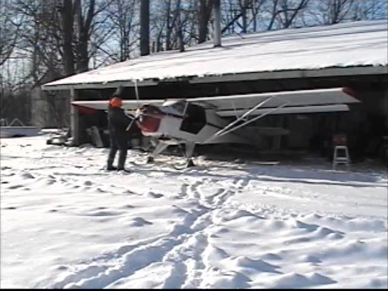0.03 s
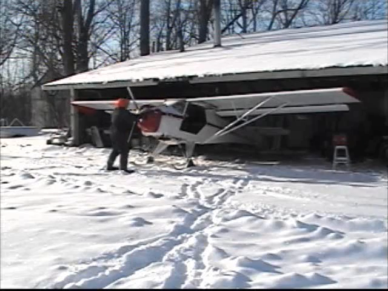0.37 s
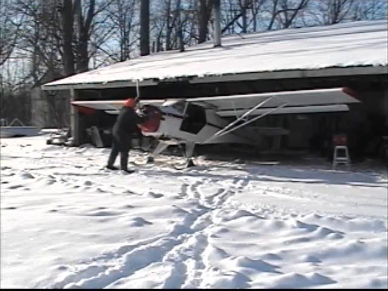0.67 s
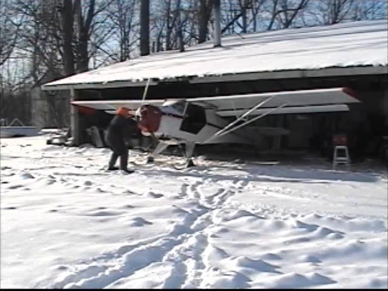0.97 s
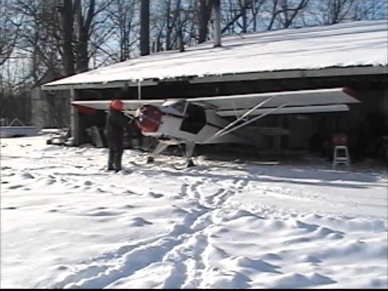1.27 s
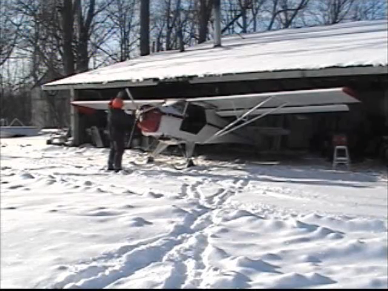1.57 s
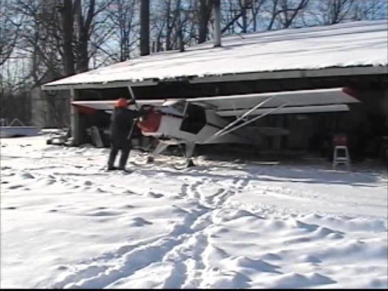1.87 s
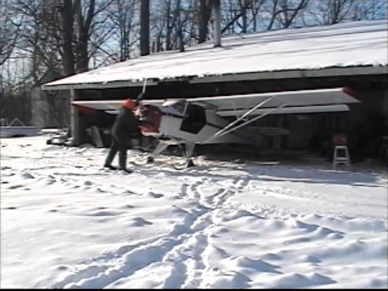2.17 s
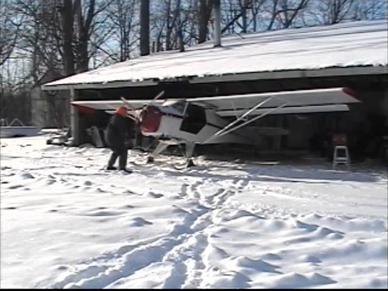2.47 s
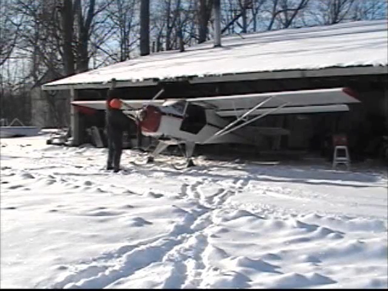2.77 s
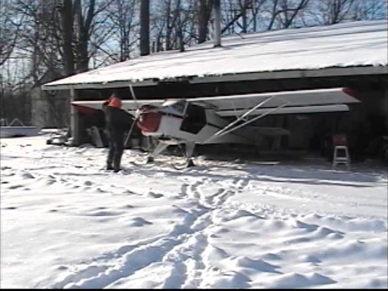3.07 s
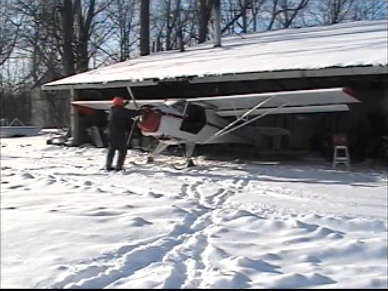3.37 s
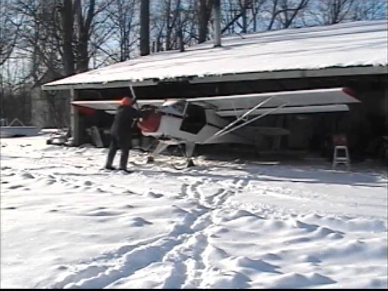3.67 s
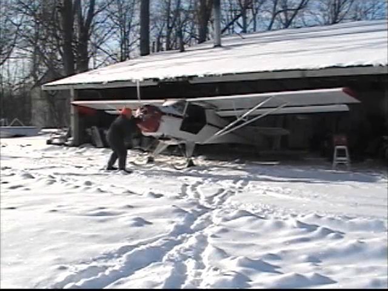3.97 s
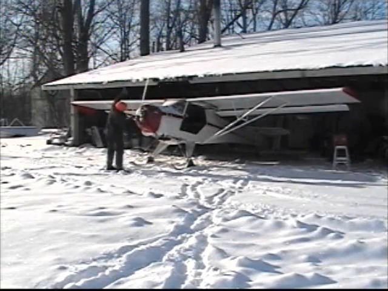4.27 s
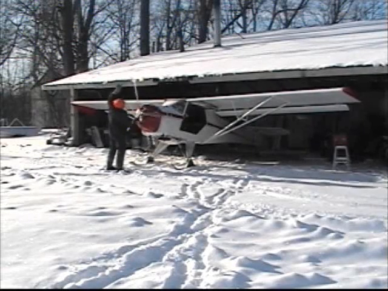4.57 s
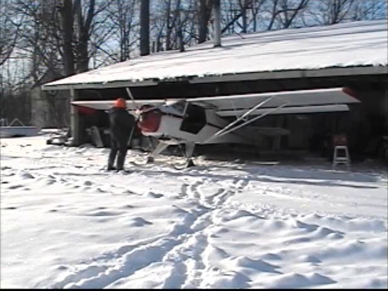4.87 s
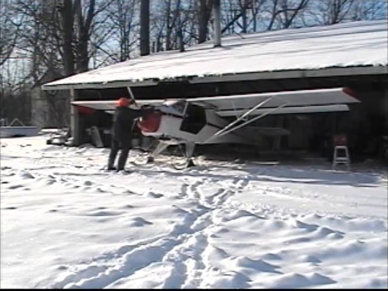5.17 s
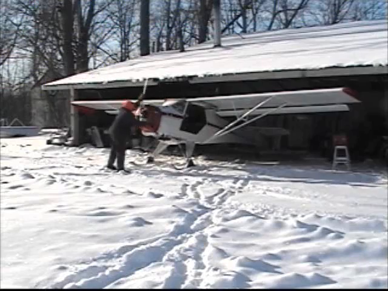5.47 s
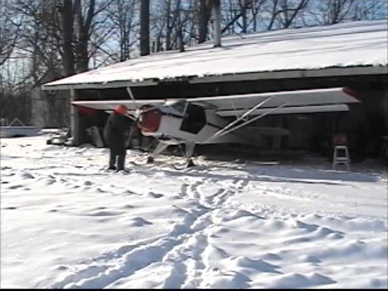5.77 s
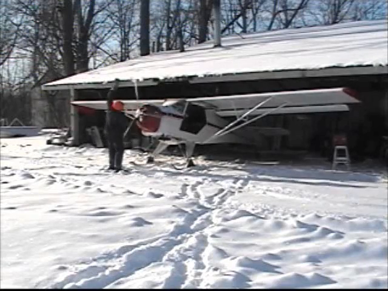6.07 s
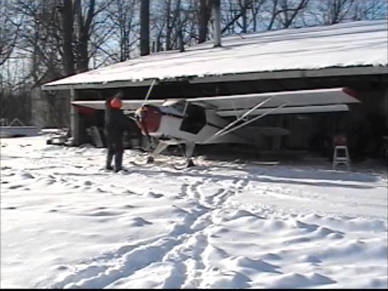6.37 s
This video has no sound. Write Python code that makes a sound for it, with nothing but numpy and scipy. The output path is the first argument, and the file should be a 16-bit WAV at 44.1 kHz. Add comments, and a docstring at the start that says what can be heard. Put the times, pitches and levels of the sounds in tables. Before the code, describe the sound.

A small aircraft's propeller is swung by hand five times, the engine chuffing and gasping in short bursts without starting.

```python
"""In the snow before an open hangar, a small aircraft's propeller is swung by hand five times.
The two-stroke engine does not start. Each piston stroke lets out a hollow chuff and draws a gasp of air,
over a rush and clatter that grow with the shaft's speed. A few times the fuel fires weakly, with a sharp
spit, a surge of gas and a boom in the muffler. Boots scuff amid brief whistles and creaks, and the
hangar echoes. A camcorder hears it all over faint outdoor noise and its own hiss and whine."""
import sys
import numpy as np
from scipy import signal
from scipy.fft import rfft, irfft, next_fast_len
from scipy.io import wavfile
from scipy.ndimage import map_coordinates

SR = 44100
rng = np.random.default_rng(int(sys.argv[2]) if len(sys.argv) > 2 else 0)


def wav_record(signal):
    """Record a signal, one row per channel, as 16-bit PCM in the file named by sys.argv[1]."""
    frames = np.transpose(np.atleast_2d(signal))
    bounded = np.clip(frames, -1, 1)
    # unit amplitude maps onto the largest positive 16-bit level
    quanta = np.round(bounded * 32767).astype(np.int16)
    wavfile.write(sys.argv[1], SR, quanta)


N = 287973

# Levels in the tables are relative: the functions add their own gains.
# The tone colour of each noise: (frequency [Hz], level [dB])
OUTDOOR_NOISE = [(15, -32), (25, 1), (38, -4.5), (52, -2), (100, 0), (160, -8), (260, -1.5), (360, -0.5),
                 (500, -2), (800, -2), (1010, -3), (1150, -17), (1700, -35), (3500, -80)]
CAMCORDER_HISS = [(700, -53), (1100, -1.5), (1500, 0.5), (1900, 0), (2900, -3), (3500, -4), (4500, -7),
                  (5100, -5.5), (6200, -7.5), (7400, -4), (8300, -10.5), (11000, -15), (13000, -25),
                  (15800, -37)]
SNOW_CRUNCH = [(600, -21), (1500, 5), (2300, 2), (3100, -1.5), (4000, -5), (7000, -14), (14000, -37)]
MUFFLER_RUMBLE = [(20, -14), (45, -1), (80, 18), (130, 15), (180, 12), (260, 4), (420, -46)]
AIR_RUSH = [(150, -51), (260, -2.5), (420, -1), (800, 2), (1300, -2), (2200, -3), (2900, -4.5), (3800, -8),
            (6500, -13), (8500, -18), (11500, -25.5), (15500, -71)]
EXHAUST_JET = [(1000, -31), (3500, 8), (6000, 5), (8500, 0.5), (10500, -5), (13000, -17), (15800, -68)]
INTAKE_HISS = [(150, -52), (250, -0.5), (482, -0.5), (646, -7), (1160, 2), (1310, -8), (2800, -0.5),
               (3890, -8.5), (6640, -9.5), (9700, -19), (12400, -29.5), (14400, -57), (15500, -44)]
EDGE_HISS = [(500, -39), (1300, 7), (2000, 1.5), (3000, 8), (4200, -8), (5500, -16), (6600, 3), (8000, -33),
             (14000, -68)]  # air at the edge of the exhaust opening
FIRING_SPIT = [(200, -30), (500, -42), (1400, -2), (2150, 5.5), (3000, 0), (5000, -0.5), (7200, 6.5),
               (9500, 4), (11500, -1.5), (13500, -11), (15800, -49)]

# The camcorder's thin whines and high line-scan whistle: (frequency [Hz], level [dB])
MID_WHINE = [(2697, -62), (3472, -64), (6745, -61), (7494, -62), (7790, -61), (15735, -61)]  # "mid" is what left and right share
SIDE_WHINE = [(582, -40.5), (1160, -51), (7494, -62)]  # "side" is added to the left and taken from the right
# How strong the side is next to the mid: (frequency [Hz], level [dB])
BACKGROUND_WIDTH = [(60, 3), (110, -1), (200, -2), (380, -3.5), (700, -2), (1290, -2.5), (2380, -4.5),
                    (4400, -6), (8120, -5), (15000, -3)]  # noise arriving from all around
PHASE_WIDTH = [(25, -1), (80, -3), (130, -5), (260, -10), (400, -15), (600, -22), (2000, -28), (5000, -32)]  # waves reaching the two microphones out of step
SCATTER_WIDTH = [(100, -24), (500, -24.5), (1200, -18), (2800, -12.5), (5000, -11.5), (9000, -7),
                 (15000, -10)]  # sound scattered unequally to the two microphones
# How much louder the left is than the right: (frequency [Hz], level [dB])
BALANCE = [(60, -4), (130, -1.5), (290, 1), (640, 1.0), (1410, 1.0), (3100, 1.5), (6820, -1), (15000, 2.5)]

# How long the hangar's echo takes to fade by 60 dB: (frequency [Hz], time [s])
HANGAR_FADE = [(100, 1), (500, 0.59), (2000, 0.15), (6000, 0.2), (14000, 0.28)]
# Bounces in the exhaust and off the aircraft; open ends flip the wave: (delay [s], gain [ratio])
ECHOES = [(.0036, -.5), (.0092, -.45), (.0111, -.78), (.0171, .4), (.0191, .5), (.0232, .45)]
# The pitches at which each part rings: (frequency [Hz], width [Hz], level [dB])
MUFFLER_RING = [(55, 27, -8), (92.2, 19.4, -1.5)]
CASING_RING = [(1910, 140, 1), (2170, 160, 3), (2830, 470, 1), (5100, 1300, -9.5), (6630, 380, -9)]
PASSAGE_RING = [(1350, 150, 3), (1876, 114, 4.5), (2146, 85, 7), (2814, 135, 2), (3353, 15, 3)]
EXHAUST_RING = [(97, 5.1, -3), (259.4, 40, -2), (397.6, 213, -0.5), (623, 374, 1.5), (908, 504, -1)]

# Boots scuff the snow: (time [s], level [dB])
SCUFFS = [(0.1394, -16), (0.2134, -21.5), (0.31, -22), (0.7332, -24.5), (0.86, -31), (1.605, -19),
          (3.847, -26), (3.9094, -18.5), (3.95, -26), (4.9, -16.5), (5.615, -29)]
# Brief whistles and squeaky creaks: (time [s], frequency [Hz], level [dB], length [s])
WHISTLES_AND_CREAKS = [(0.293, 2165, -33.5, 0.039), (0.74, 1287, -42, 0.1), (1.021, 2750, -20, 0.017),
                       (1.354, 2156, -21, 0.03), (1.578, 1510, -36, 0.07), (2.642, 2160, -25, 0.03),
                       (2.894, 1880, -19, 0.03), (3.85, 1570, -46, 0.1), (4.533, 2176, -20.5, 0.049),
                       (5.72, 1395, -27.5, 0.031), (5.738, 2720, -25.5, 0.024), (5.94, 2180, -19, 0.046),
                       (5.999, 2160, -18, 0.04)]
# Propeller swings: (pull time [s], fastest time [s], stop time [s], peak airflow [dB])
SWINGS = [(-0.4, -0.076, 0.09, -17.5), (0.945, 1.293, 1.45, -18.5), (2.369, 2.747, 3.057, -21),
          (4.001, 4.417, 4.774, -17), (5.665, 6.114, 6.372, -17.5)]
# Air leaks past the piston just before a chuff: (time [s], level [dB])
LEAKS = [(0.936, -23.5), (1.06, -34), (1.166, -23), (2.368, -23.5), (2.495, -23), (2.603, -20.5),
         (3.997, -21), (5.653, -27), (5.787, -29)]
# The piston uncovers the exhaust: (time [s], chuff level [dB], hiss over chuff [dB], gasp level [dB])
STROKES = [(0.0, -10, -14, -8.5), (0.082, -5, -6, -20), (0.166, -15.5, -18, -30), (0.954, -11.5, -15, -9.5),
           (1.08, -7.5, -6.5, -12), (1.177, -2.5, -10, -5), (1.252, -3.5, -4, -11),
           (1.333, -10.5, -12, -10.5), (1.419, -7.5, -3, -15), (2.235, -19.5, -13, -26),
           (2.383, -10.5, -6, -12), (2.514, -7.5, -14, -6.5), (2.616, -4, -7, -9.5), (2.701, -4.5, -2, -15),
           (2.775, -3, -2, -7), (2.849, -7.5, 4.5, -4.5), (2.939, -16.5, -18, -10.5),
           (3.026, -6.5, -3.5, -34), (3.115, -19, -21, -35), (4.014, -7, -13, -10), (4.13, -7.5, -5, -4.5),
           (4.228, -3.5, -10, -10), (4.305, -4.5, -6, -18), (4.402, -7.5, 9.5, -14), (4.449, -4.5, 0, -10),
           (4.557, -3.5, -5.5, -4.5), (4.636, 0.5, -3, -3.5), (4.731, -2, -4, -23), (4.844, -23, -5, -36),
           (5.683, -10.5, -15, -14), (5.804, -6, -6, -5), (5.9, -3, -2, -5.5), (5.975, -7, 2.5, -2.5),
           (6.185, -5.5, 0, -5), (6.258, -9, -4, -8), (6.359, -4, -2, -23)]
# The fuel fires weakly: (time [s], spit level [dB], boom over spit [dB], gas surge level [dB])
FIRINGS = [(2.7294, -5.5, -3, -12), (4.338, -6, -8, -13), (4.3923, -6.5, -17, -15),
           (4.596, -9, -1.5, -21.5), (6.007, -7, -1.5, -16), (6.0698, -10, -0.5, -22),
           (6.1341, -11, 3, -18)]


def amp(db):
    """Turn decibels into a gain."""
    return 10 ** (np.asarray(db) / 20)


def unit(x):
    """Scale a sound to an average strength (rms) of 1."""
    return x / np.sqrt(np.mean(x ** 2) + 1e-20)


def along(points, hz):
    """Read between (frequency, value) points on a log frequency scale."""
    freqs, values = np.transpose(points)
    return np.interp(np.log(hz + 1), np.log(freqs + 1), values)


def filtered(x, response):
    """Change each frequency's strength and phase by response(hz)."""
    n = x.shape[-1]
    padded = next_fast_len(n + SR // 2)
    return irfft(rfft(x, padded) * response(np.fft.rfftfreq(padded, 1 / SR)), padded)[..., :n]


def resonances(modes, hz):
    """The response of a part that rings at several pitches."""
    return sum((-1) ** k * amp(db) * 1j * hz * width / (centre ** 2 - hz ** 2 + 1j * hz * width)
               for k, (centre, width, db) in enumerate(modes))


def noise(spectrum):
    """Steady noise with the given tone colour."""
    return unit(filtered(rng.standard_normal(N), lambda hz: amp(along(spectrum, hz))))


def ringing_noise(modes):
    """Steady noise passed through a part that rings."""
    return filtered(rng.standard_normal(N), lambda hz: resonances(modes, hz))


def wobble(rate):
    """A smooth curve through `rate` random values a second."""
    knots = rng.standard_normal(int(N * rate / SR) + 4)
    smooth = map_coordinates(knots, [np.arange(10 * len(knots)) / 10], mode="nearest")
    return np.interp(np.arange(N) * 10 * rate / SR, np.arange(len(smooth)), smooth)


def bursts(times, levels_db, attack, t60):
    """A loudness curve of half-second bursts that rise fast, then fall 60 dB every t60 seconds."""
    power, t = np.zeros(N + SR), np.arange(SR // 2) / SR
    shape = (1 - np.exp(-t / attack)) * amp(-60 * t / t60)
    for start, db in zip(times, levels_db):
        power[max(round(start * SR), 0):][:len(t)] += (amp(db) * shape / shape.max()) ** 2
    return np.sqrt(power[:N])


def impulses(times, gains):
    """A one-sample click at each time."""
    return np.bincount(np.clip(np.round(times * SR).astype(int), 0, N - 1), gains, N)


def tone(hz, waver):
    """A pure tone of strength 1, pushed ahead and back by `waver` radians."""
    return np.sqrt(2) * np.sin(2 * np.pi * hz * np.arange(N) / SR + waver)


def echoed(x):
    """A sound plus its quick bounces in the exhaust and off the aircraft."""
    return filtered(x, lambda hz: 1 + sum(gain * np.exp(-2j * np.pi * hz * delay)
                                          for delay, gain in ECHOES))


def camcorder_whine(tones):
    """The camcorder's thin whines and high line-scan whistle, wavering slightly."""
    drift = 1.3 * wobble(14)
    return sum(amp(db) * tone(hz, drift) for hz, db in tones)


def background(outdoors_db=-38.5, hiss_db=-43.0, width_db=-1):
    """Outdoor noise from all around, with the camcorder's hiss and whine, as mid and side."""
    swell = amp(outdoors_db + .9 * wobble(3.5))
    mid, side = (swell * noise(OUTDOOR_NOISE) + amp(hiss_db) * noise(CAMCORDER_HISS) for _ in range(2))
    side = filtered(side, lambda hz: amp(along(BACKGROUND_WIDTH, hz) + width_db))
    return mid + camcorder_whine(MID_WHINE), side + camcorder_whine(SIDE_WHINE)


def hangar(x, build_s=0.015):
    """The hangar's wash of echoes swells, then dies sooner in the treble than in the bass."""
    hz, t, bands = signal.stft(rng.standard_normal((2, int(.6 * SR))), SR, nperseg=256)
    fade = amp(-60 * t / along(HANGAR_FADE, hz)[:, None])
    swell = 1 - np.exp(-(t / build_s) ** 2)
    tails = signal.istft(bands * fade * swell, SR, nperseg=256)[1]
    first, second = signal.fftconvolve(x[None], tails / np.linalg.norm(tails[0]), axes=1)[:, :N]
    drift = 1.59 * wobble(4)  # the moving propeller and body keep changing the echo paths
    return np.cos(drift) * first + np.sin(drift) * second


def boots(scuff_db=-14):
    """Boots shift in the cold snow with a grainy crunch."""
    times, db = np.transpose(SCUFFS)
    crunch = unit(noise(SNOW_CRUNCH) * amp(2.5 * wobble(400)))
    return amp(scuff_db) * crunch * bursts(times, db, attack=.015, t60=.11)


def whistles_and_creaks(gain_db=-1):
    """Brief whistles and squeaky creaks sound on an unsteady pitch as the engine is turned."""
    sound, waver = np.zeros(N), wobble(290)
    for start, hz, db, length in WHISTLES_AND_CREAKS:
        span = np.arange(round(start * SR), min(round((start + length) * SR), N))
        swell = np.sin(np.linspace(0, np.pi, len(span)))
        sound[span] += amp(db + gain_db) * swell * tone(hz, waver)[span]
    return sound


def swing_flow(pull_db=-13, stop_db=-8.5, rise_db_per_s=400, settle_db_per_s=122):
    """Airflow grows until the propeller is fastest, eases, and settles after it stops."""
    t, flow = np.arange(N) / SR, np.zeros(N)
    for pull, fastest, stop, db in SWINGS:
        turning_db = np.interp(t, [pull, fastest, stop], [pull_db, 0, stop_db])
        fade_db = rise_db_per_s * np.maximum(pull - t, 0) + settle_db_per_s * np.maximum(t - stop, 0)
        flow += amp(db + turning_db - fade_db)
    return flow


def surge_flow():
    """The flow of gas that follows each firing."""
    times, _, _, db = np.transpose(FIRINGS)
    return bursts(times, db, attack=0.018, t60=0.6)


def muffler_drone(note_hz=119, note_db=-3, hum_db=-8.5, rumble_db=-14, burn_db=-13, strong_flow_db=-16):
    """Strokes and flowing gas keep the muffler humming; a strong flow blows it like a bottle."""
    times, db, _, _ = np.transpose(STROKES)
    kicks = bursts(times, -24 + 0.54 * db, attack=0.0041, t60=0.88)
    level = np.sqrt((amp(-7) * swing_flow()) ** 2 + (amp(-9) * surge_flow()) ** 2 + kicks ** 2)
    hum = unit(ringing_noise(MUFFLER_RING))
    note = tone(note_hz, 1.44 * wobble(18))
    blowing = amp(note_db + 2.1 * wobble(25)) * (level / amp(strong_flow_db)) ** 0.52
    shaking = amp(rumble_db) * level + amp(burn_db) * surge_flow()  # burning gas adds deep rumble
    return level * (blowing * note + amp(hum_db) * hum) + shaking * noise(MUFFLER_RUMBLE)


def clatter(ticks_per_s=170, spread_db=4, clatter_db=-7):
    """Loose parts tick at random and ring the engine's casing while the shaft turns."""
    ticks = (rng.random(N) < ticks_per_s / SR) * amp(spread_db * rng.standard_normal(N))
    ring = unit(echoed(filtered(ticks, lambda hz: resonances(CASING_RING, hz))))
    return amp(clatter_db) * swing_flow() * ring


def piston_leaks(whistle_db=-5, whistle_hz=1390):
    """On a swing's slow first strokes, squeezed air slips past the piston with a hiss and a whistle."""
    times, db = np.transpose(LEAKS)
    whistle = amp(whistle_db) * tone(whistle_hz, 0.58 * wobble(200))
    return bursts(times, db, attack=.003, t60=.085) * (noise(INTAKE_HISS) + whistle)


def intake_gasps(gasp_db=-13, stroke_share=0.43, longest_stroke_s=0.114):
    """Part-way through each stroke the intake opens with a gasp, sooner when the shaft turns faster."""
    times, _, _, db = np.transpose(STROKES)
    stroke_s = np.minimum(np.diff(times, append=np.inf), longest_stroke_s)
    opens = times + stroke_share * stroke_s
    return bursts(opens, db + gasp_db, attack=0.008, t60=0.082) * noise(INTAKE_HISS)


def rushing_air(rush_db=-1, ring_db=-5, roar_db=-19, jet_db=-20, full_flow_db=-13):
    """Air rushes through the engine's passages as the shaft turns, along with the gasps and leaks."""
    flow = np.hypot(swing_flow(), surge_flow())
    ring = unit(ringing_noise(PASSAGE_RING))
    flutter = amp(1.5 * wobble(70))
    rush = flow * flutter * (amp(rush_db) * noise(AIR_RUSH) + amp(ring_db) * ring)
    # a fast flow roars in the exhaust and leaves it as a bright jet, both sputtering
    force = flow / amp(full_flow_db)
    roar = unit(echoed(ringing_noise(EXHAUST_RING)) * amp(3.5 * wobble(160)))
    jet = unit(noise(EXHAUST_JET) * amp(3.3 * wobble(90)))
    exhaust = amp(roar_db) * force ** 1.5 * roar + amp(jet_db) * force ** 1.93 * jet
    return rush + exhaust + intake_gasps() + piston_leaks()


def firings(spit_db=-3, boom_db=-3, boom_hz=118, boom_fade_s=0.097, boom_rise_s=0.023):
    """A weak firing spits from the exhaust and sets the air in the muffler booming."""
    times, db, boom_over_db, _ = np.transpose(FIRINGS)
    spit = bursts(times, db + spit_db, attack=0.0014, t60=0.13) * noise(FIRING_SPIT)
    t = np.arange(SR // 2) / SR
    ring = np.sin(2 * np.pi * boom_hz * t) * amp(-60 * t / boom_fade_s) * (1 - np.exp(-t / boom_rise_s))
    kicks = impulses(times, amp(db + boom_over_db + boom_db))
    return spit + signal.fftconvolve(kicks, ring / ring.max())[:N]


def exhaust_pipe(x, modes, dull_above_hz=1500):
    """The exhaust rings at its own pitches and softens the treble."""
    return filtered(x, lambda hz: resonances(modes, hz) / (1 + 1j * hz / dull_above_hz))


def chuffs(chuff_db=1.2, hiss_db=-9, bright_db=-2, vary_db=1.26, echo_drift=.025):
    """Squeezed air escapes all at once, rings the exhaust and hisses at the edge of the opening."""
    times, db, hiss_over_db, _ = np.transpose(STROKES)
    brightness, drift = rng.standard_normal((len(times), 2)).T

    def puffs(levels_db):
        """One pulse a stroke, with echoes that shift a little each time."""
        return sum(impulses(times + delay * (1 + echo_drift * drift), gain * amp(levels_db))
                   for delay, gain in [(0, 1)] + ECHOES)

    low = exhaust_pipe(puffs(db), EXHAUST_RING[:-1])
    high = exhaust_pipe(puffs(db + bright_db + vary_db * brightness), EXHAUST_RING[-1:])
    peak = np.abs(exhaust_pipe(signal.unit_impulse(SR // 4), EXHAUST_RING)).max()
    hiss = bursts(times, db + hiss_over_db + hiss_db, attack=0.0006, t60=0.017) * noise(EDGE_HISS)
    return amp(chuff_db) * (low + high) / peak + echoed(hiss)


def scene():
    """The engine and the hangar lie straight ahead of two closely spaced microphones."""
    strokes = chuffs()
    turning = rushing_air() + clatter()
    fire = firings()
    small_sounds = boots() + whistles_and_creaks()
    into_hangar = amp(-12) * strokes + amp(-11) * turning + amp(-9) * fire + amp(-10) * small_sounds
    ahead = strokes + turning + fire + small_sounds + hangar(into_hangar) + muffler_drone()
    # the microphones hear the bass out of step, and unlike swirls of air and echoes in the treble
    out_of_step = filtered(ahead, lambda hz: 1j * amp(along(PHASE_WIDTH, hz)))
    unshared = rushing_air() + firings() + hangar(strokes, build_s=0.0022)
    scattered = filtered(unshared, lambda hz: amp(along(SCATTER_WIDTH, hz)))
    background_mid, background_side = background()
    mid, side = ahead + background_mid, out_of_step + scattered + background_side
    left_right = np.array([mid + side, mid - side])
    return filtered(left_right, lambda hz: amp(np.outer([.5, -.5], along(BALANCE, hz))))


def record(dry, drum_hz=149.85, depth=.64, feedback=.48, top_hz=15800):
    """The camcorder turns down its tape drum's pitches, rounds off peaks and cuts the highest treble."""
    def notches(hz):
        """A dip at every multiple of the drum's spin rate."""
        delay = np.exp(-2j * np.pi * hz / drum_hz)
        return 1 - depth * (1 - feedback) * delay / (1 - feedback * delay)

    notched = filtered(dry, notches)
    rounded = notched / (1 + np.abs(notched) ** 8) ** (1 / 8)
    return filtered(rounded, lambda hz: hz < top_hz)


dry = scene()
out = record(dry)
wav_record(out)
```